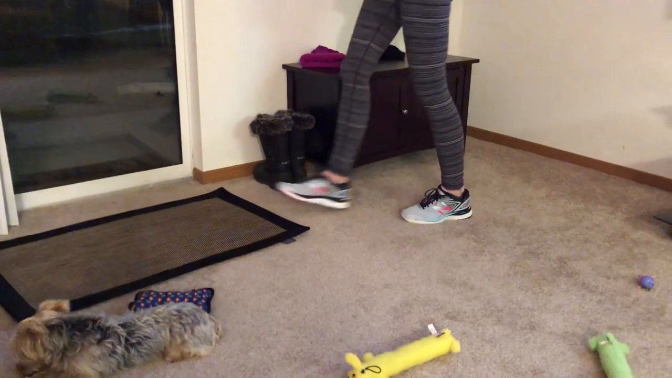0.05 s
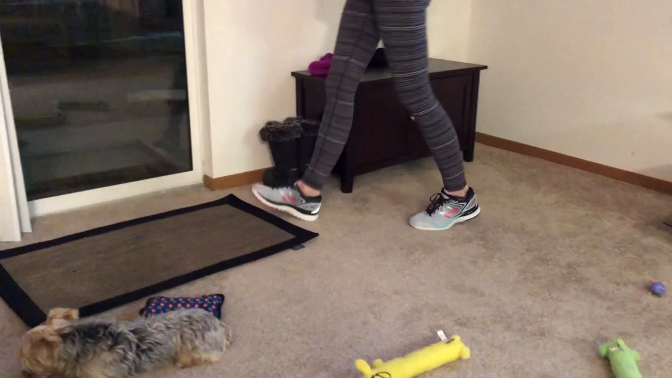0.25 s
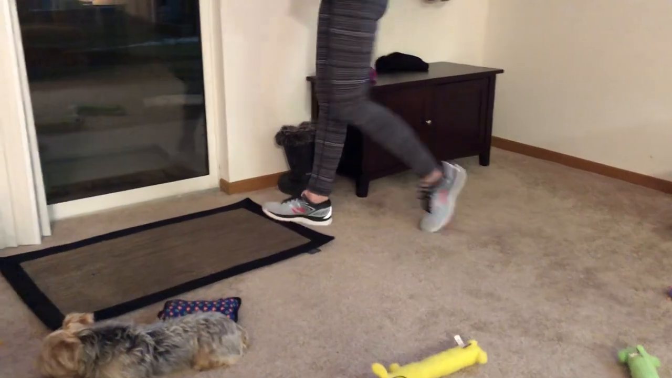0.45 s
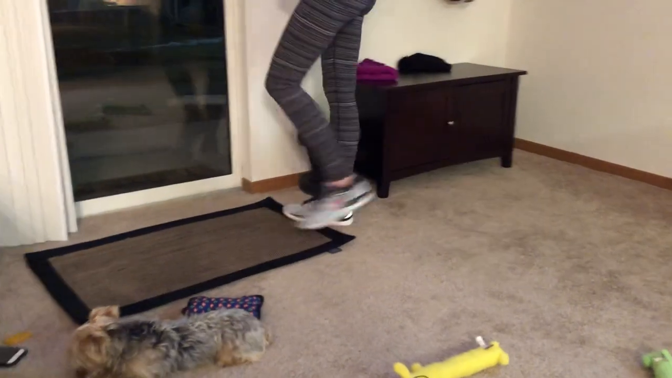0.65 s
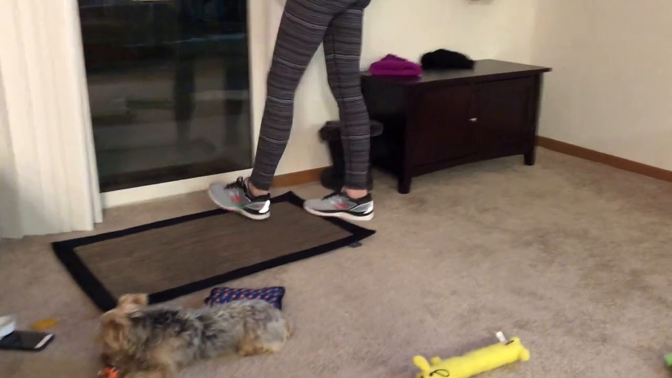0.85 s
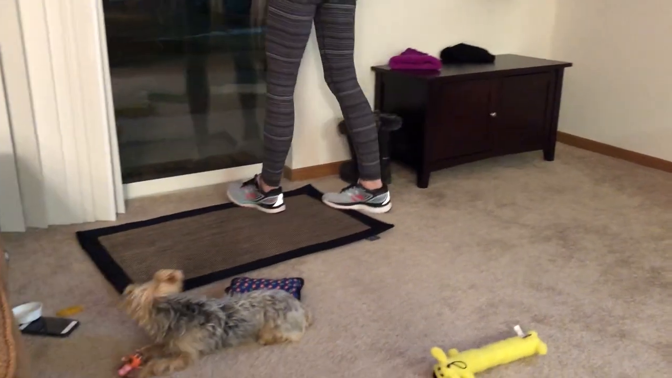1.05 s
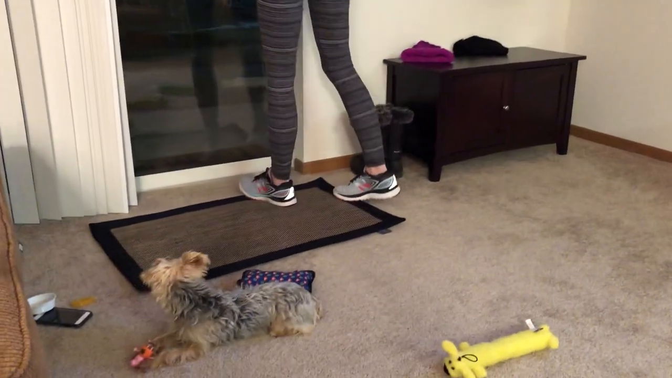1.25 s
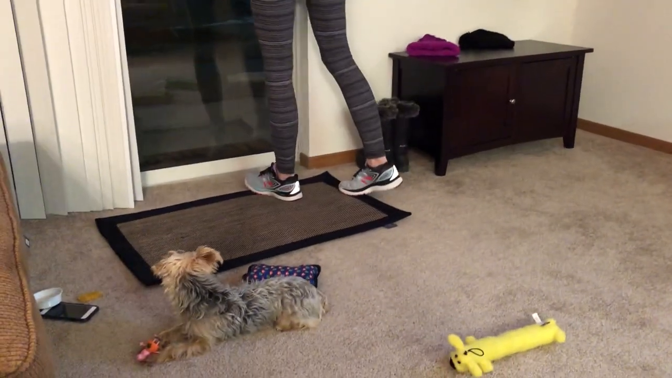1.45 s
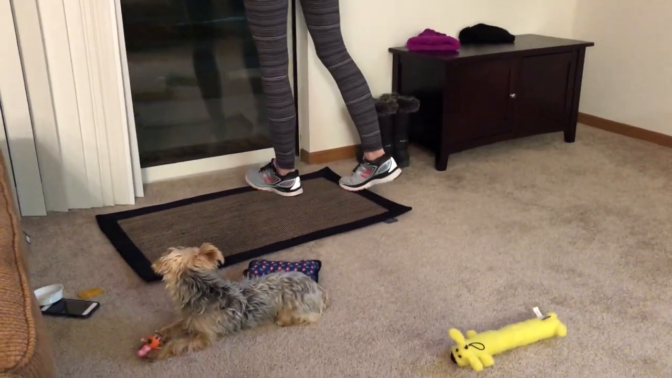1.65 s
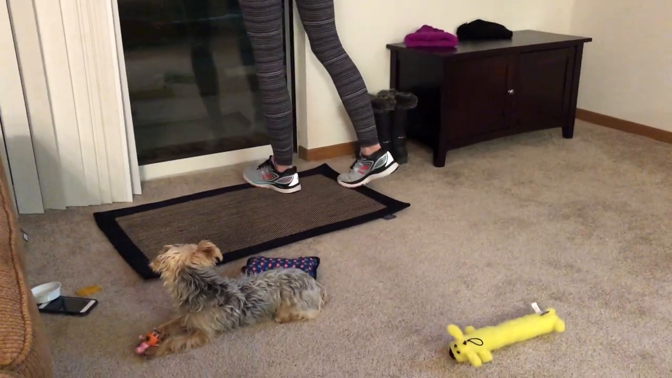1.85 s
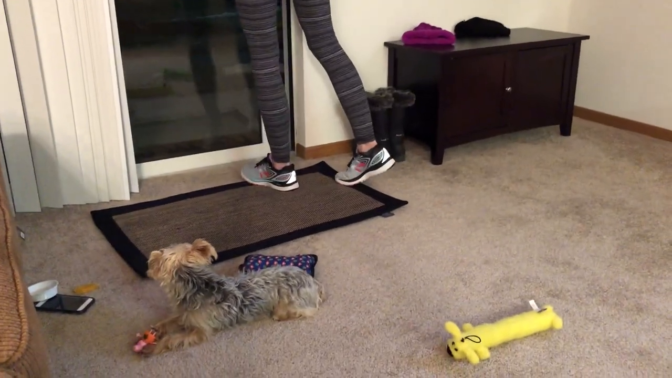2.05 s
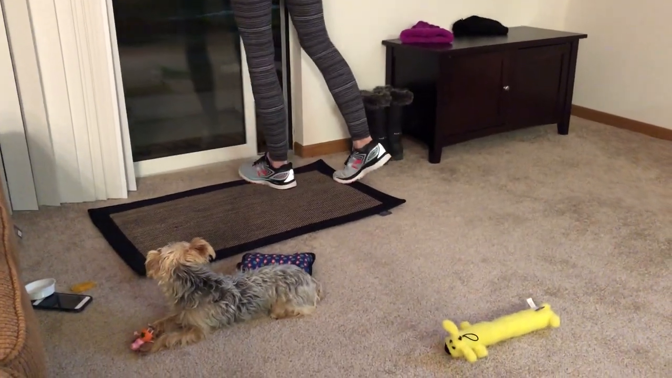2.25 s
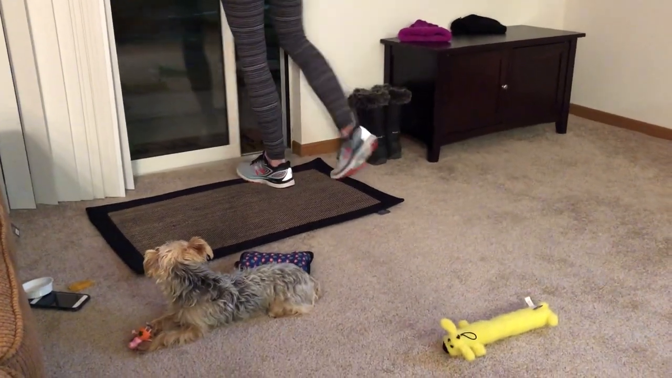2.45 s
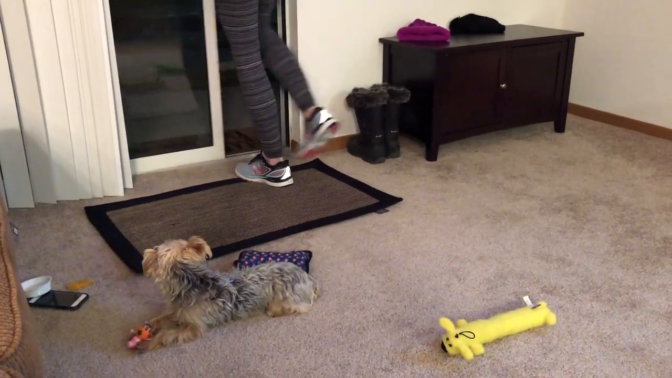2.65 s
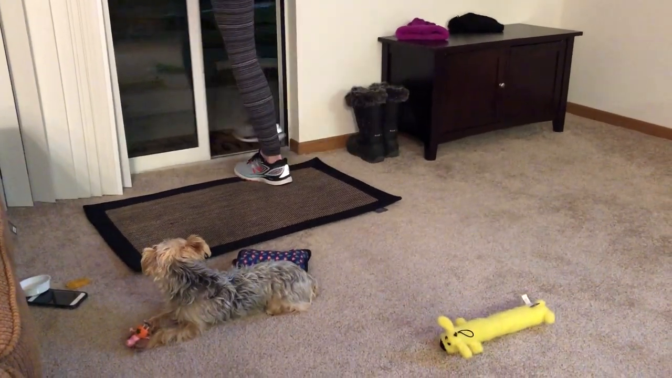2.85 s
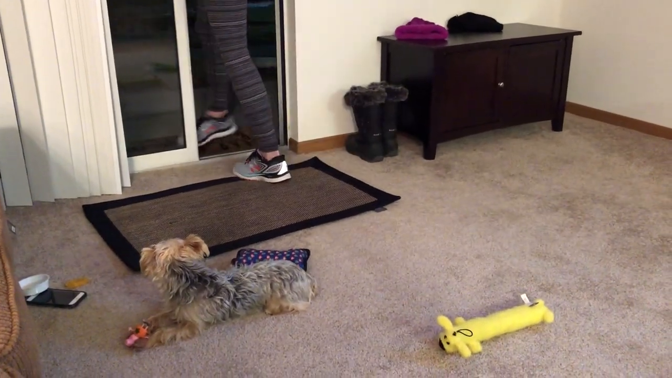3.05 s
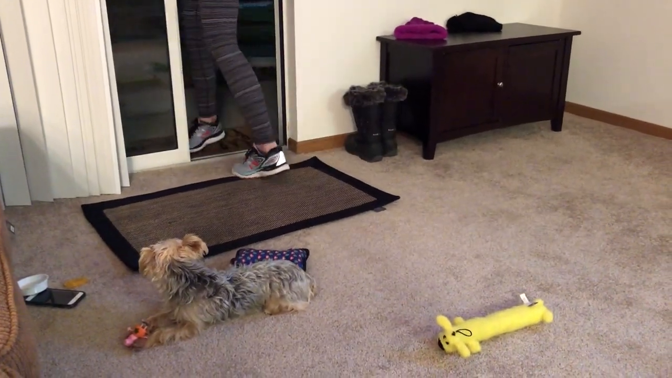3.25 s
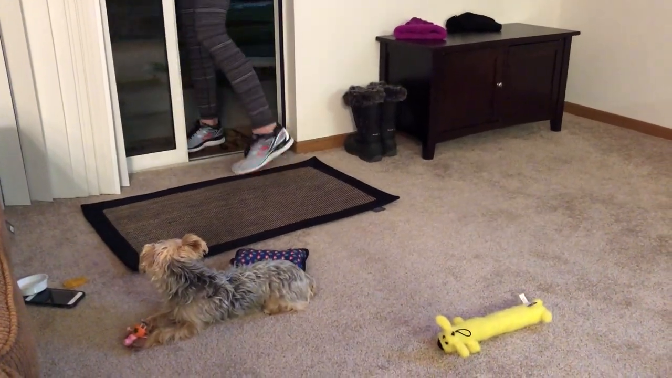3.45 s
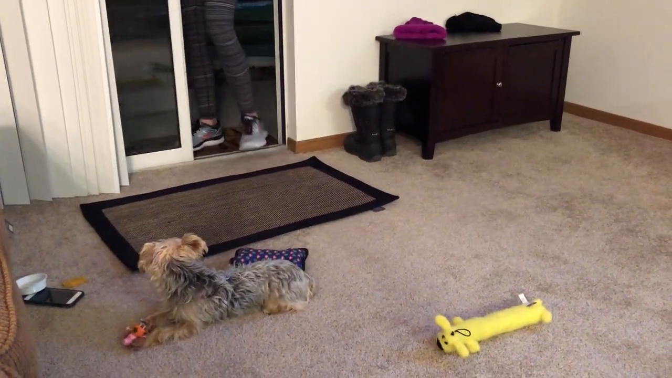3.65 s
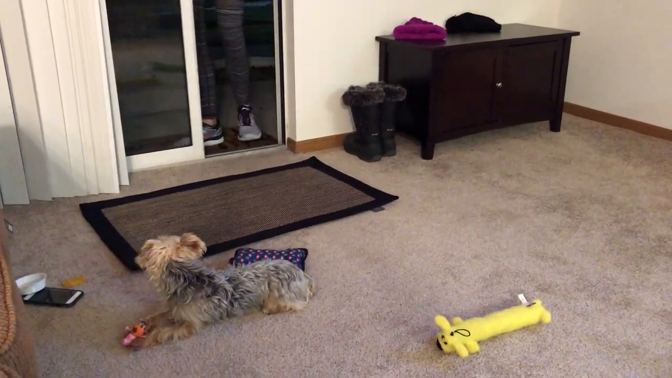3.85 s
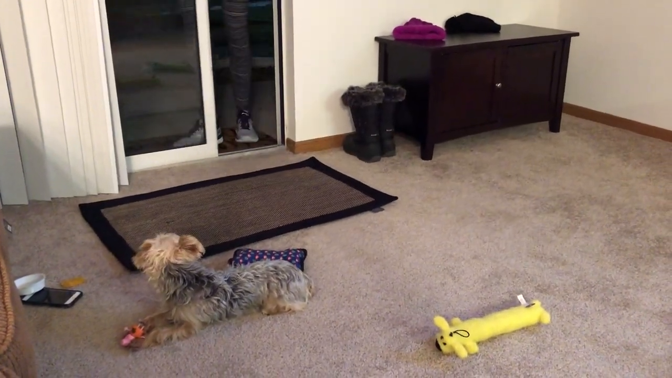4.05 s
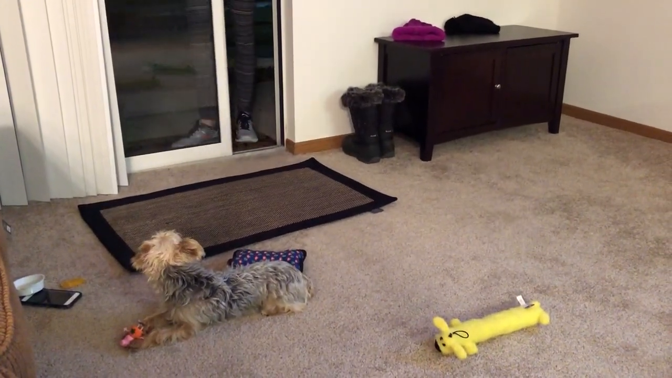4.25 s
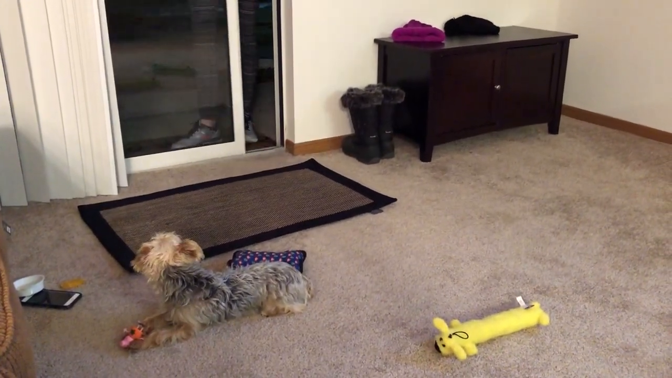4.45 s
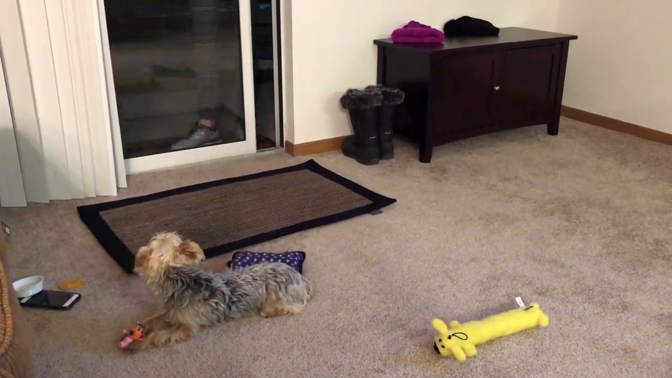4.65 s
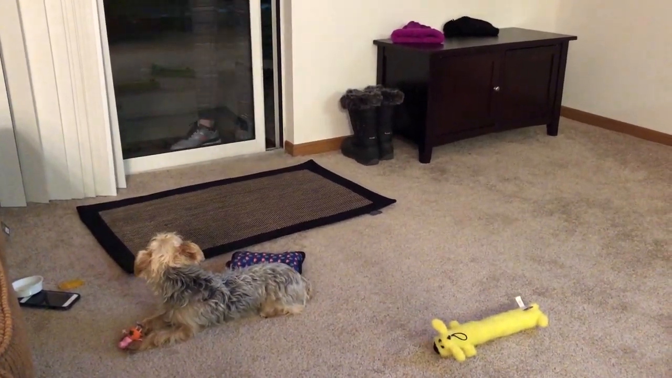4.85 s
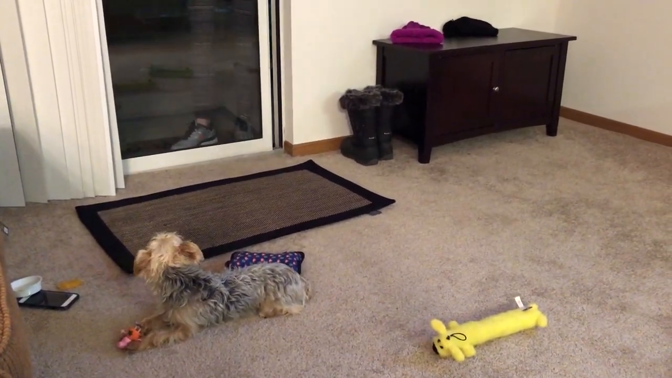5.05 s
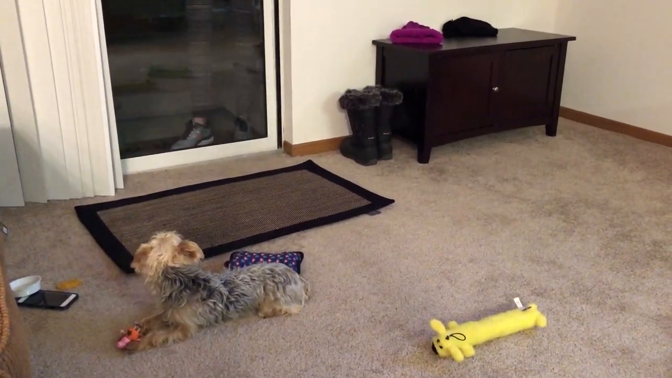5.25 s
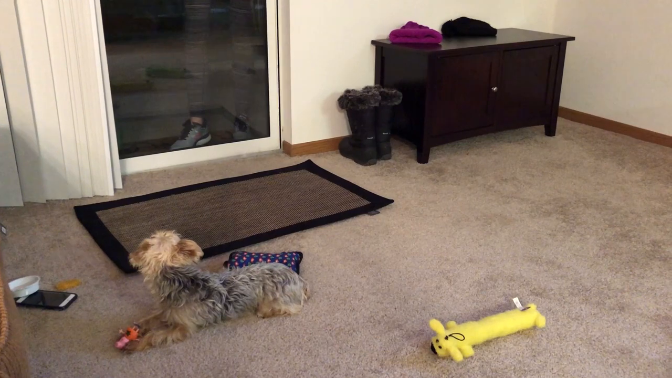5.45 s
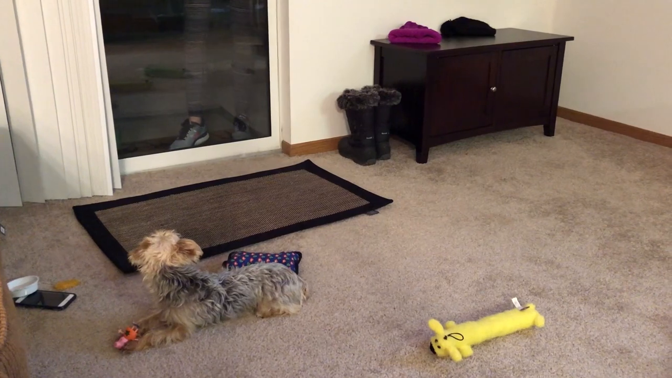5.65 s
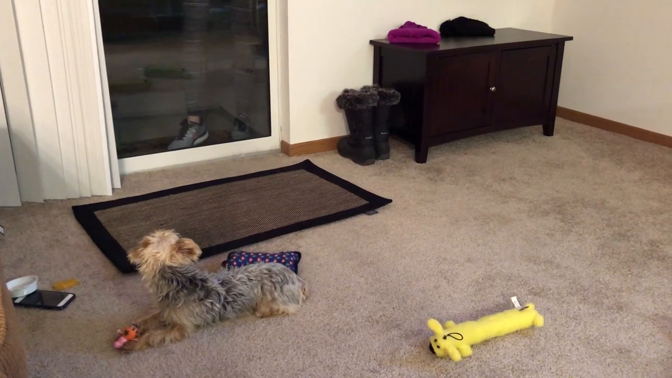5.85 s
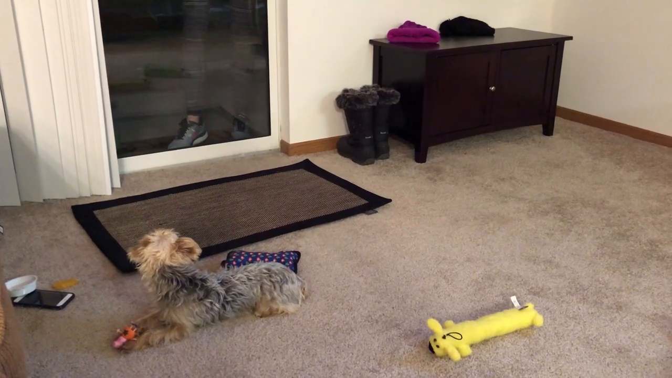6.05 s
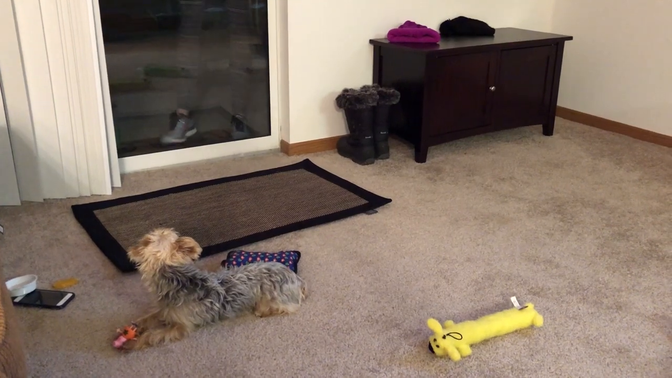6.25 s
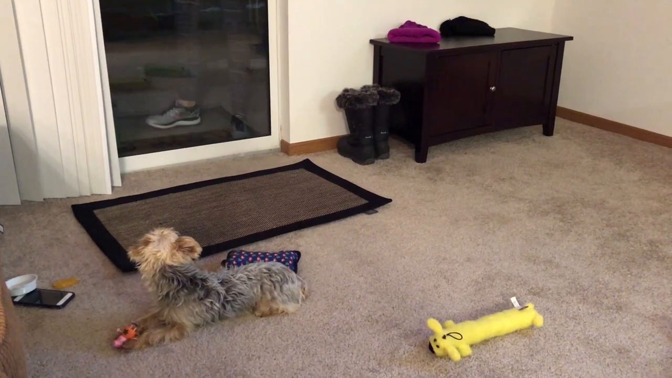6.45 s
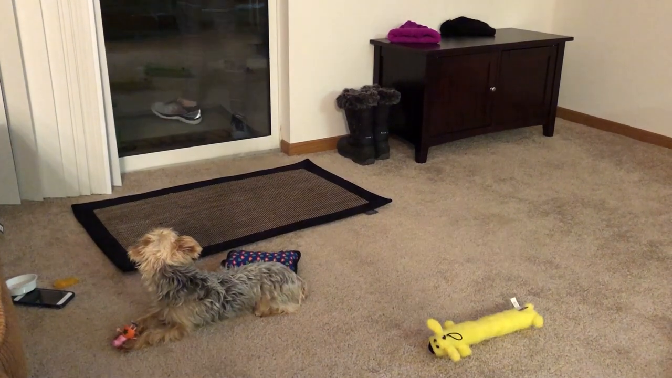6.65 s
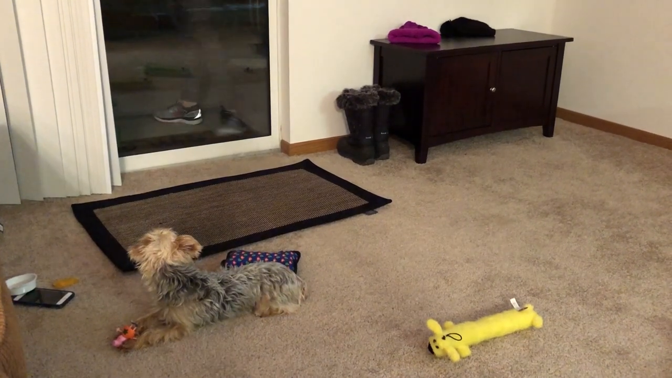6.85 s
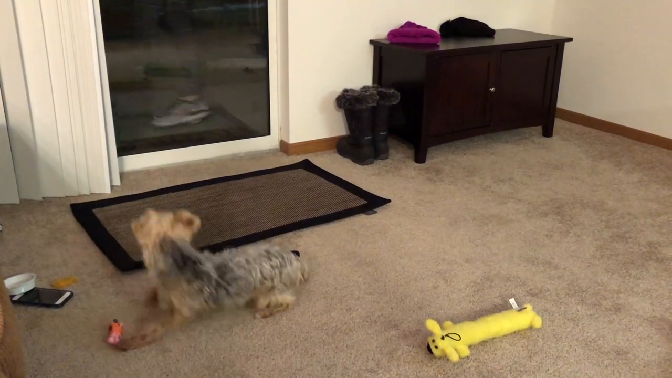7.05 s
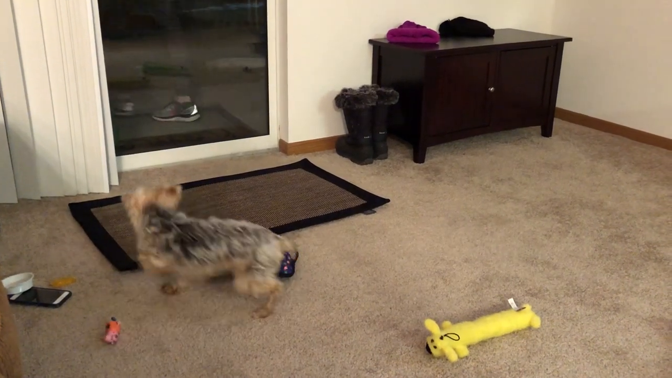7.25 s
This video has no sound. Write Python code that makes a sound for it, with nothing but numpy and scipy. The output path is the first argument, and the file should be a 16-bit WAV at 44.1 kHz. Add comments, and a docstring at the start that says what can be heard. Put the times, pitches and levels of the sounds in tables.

```python
"""Shoes and clothes, made of fine noise grains, rustle over a low hum that fades into the quiet room.
A sliding glass door is unlatched (ringing metal and glass) and peeled off its squealing weather seal.
It rolls open on wheels that jolt a rough track, with drones, rattles and one ping of the rail.
Clothes brush the frame as someone steps out, and the door rolls back.
It bumps the jamb, squeaks as a thin whistle, swishes into the seal and knocks shut."""
import sys
import numpy as np
from scipy import signal
from scipy.fft import rfft, irfft
from scipy.io import wavfile
from scipy.ndimage import uniform_filter1d

SR = 44100
rng = np.random.default_rng(int(sys.argv[2]) if len(sys.argv) > 2 else 0)


def dump_mix(stems):
    """Bounce the given channels to the path in sys.argv[1] as a 16-bit WAV at rate SR."""
    frames = np.atleast_2d(stems).T  # one column per channel
    limited = np.clip(frames, -1, 1)  # hard clip at full scale
    pcm = np.round(limited * 32767).astype(np.int16)
    wavfile.write(sys.argv[1], SR, pcm)


N = 322088
T = np.arange(N) / SR   # time of every sample [s]

# Ways the track and the floor under it ring: (pitch [Hz], level [dB], time to fall 60 dB [s])
TRACK = [(41, -21, 0.27), (51.7, -8.5, 0.36), (77.5, -3.5, 0.13), (106.3, -5, 0.18), (129.8, 0, 0.28),
         (149.3, -7, 0.34), (185.3, 1.5, 0.17), (229, 3.5, 0.11), (270.6, 1, 0.12), (319, 2.5, 0.16),
         (350.3, 1, 0.28), (376.6, -2.5, 0.14), (442.5, -6, 0.16), (497.5, 0, 0.12), (545.3, -2, 0.31),
         (583, -6, 0.33), (645.3, -1.5, 0.15), (716, 4.5, 0.087), (774, 2.5, 0.081), (887.3, 0.5, 0.15),
         (980, -41, 0.068), (1052, -4.5, 0.15), (1160, -1, 0.1), (1221, 3, 0.11)]
# Ways the metal frame and latch ring: (pitch [Hz], level [dB], time to fall 60 dB [s])
FRAME = [(459, -3.5, 0.23), (568, 0, 0.12), (650, -6, 0.24), (702, -2.5, 0.23), (758, -2, 0.13),
         (817.5, -0.5, 0.14), (856, -6, .19), (1066, -24, 0.12), (1156, -10, .13), (1318, -2.5, 0.24),
         (1455, -2, 0.15), (1740, 4, 0.14), (2000, 2, 0.092), (2340, -9, 0.072), (2730, 3, 0.049),
         (2825, -6, 0.049), (3840, -5, .08), (4830, 5, 0.2), (4960, -11, 0.26), (4950, -1, .2),
         (7840, -8, .1), (8340, -10, .13)]
# Rolling loudness while the door opens, which stands for its speed: (time [s], level [dB])
OPENING = [(1.7, -61), (2.0, -43), (2.3, -38.5), (2.56, -39.5), (2.72, -40.5), (2.85, -41), (3.2, -49),
           (3.35, -51.5), (3.58, -62)]
# The same while it closes: (time [s], level [dB])
CLOSING = [(3.66, -60.5), (3.93, -43), (4.06, -40), (4.17, -41), (4.26, -38.5), (4.72, -41), (4.88, -44.5),
           (5.02, -46), (5.5, -64.5), (5.58, -76)]

RUB_JUDDER_DB, RUB_JUDDER_PER_S = 2, 83   # the rub catches and lets go


def from_db(db):
    """Turn decibels into a plain gain."""
    return 10 ** (np.asarray(db) / 20)


def rms_one(x):
    """Scale a sound to an average (rms) level of 1."""
    return x / np.sqrt(np.mean(x ** 2) + 1e-20)


def even(x):
    """Hold the running level at rms 1, keeping the fast flutter."""
    return x / np.sqrt(uniform_filter1d(x * x, size=SR // 7) + 1e-12)


def in_time(rows):
    """Columns of a curve at every sample."""
    times, *columns = np.transpose(rows)
    return [np.interp(T, times, column) for column in columns]


def during(start, end, fade):
    """Gain of one from start to end, fading outside."""
    return np.clip(1 + np.minimum(T - start, end - T) / fade, 0, 1)


def swell(s, db, rise, fall):
    """Gain that grows to a peak at time s and dies away."""
    return from_db(db) * np.exp(-np.maximum((s - T) / rise, (T - s) / fall))


def wobble(depth_db, per_s):
    """Wandering gain of a contact that bears unevenly."""
    times = np.arange(0, 8, 1 / 200)
    r = np.exp(-2 * np.pi * per_s * times[1])
    slow = signal.lfilter([1], [1, -2 * r, r * r], rng.standard_normal(len(times)))
    return from_db(depth_db * np.interp(T, times, rms_one(slow)))


def at_hz(points, hz):
    """Read a curve drawn over a logarithmic pitch scale."""
    f, value = np.transpose(points)
    return np.interp(np.log(hz + 1e-3), np.log(f), value)


def colour(x, spectrum):
    """Give x a spectrum that falls away steeply past its ends; rms 1."""
    hz = np.arange(len(x) // 2 + 1) * SR / len(x) + 1e-3
    low_end = 1 / np.sqrt(1 + (.8 * spectrum[0][0] / hz) ** 8)
    high_end = 1 / np.sqrt(1 + (.8 * hz / spectrum[-1][0]) ** 8)
    shape = from_db(at_hz(spectrum, hz)) * low_end * high_end
    return rms_one(irfft(rfft(x) * shape, len(x)))


def band(x, low_hz, high_hz, order=2):
    """Keep only the pitches between two limits."""
    sos = signal.butter(order, [low_hz, min(high_hz, .45 * SR)], "band", fs=SR, output="sos")
    return signal.sosfilt(sos, x + 1e-18)


def ring(x, hz, t60):
    """A unit click sets a sine of height 1 ringing."""
    r, w = from_db(-60 / (t60 * SR)), 2 * np.pi * hz / SR
    return signal.lfilter([0, np.sin(w)], [1, -2 * r * np.cos(w), r * r], x + 1e-18)


def body(x, modes):
    """Drive several rings side by side, with alternating signs."""
    return sum((-1) ** k * from_db(db) * ring(x, hz, t60) for k, (hz, db, t60) in enumerate(modes))


def struck(modes, centre_hz, octaves, t):
    """The modes near a centre pitch ring out, each in its own phase; rms 1 at the start."""
    hz, level_db, t60 = np.transpose(modes)[:, :, None]
    weight = from_db(level_db) / (1 + (np.abs(np.log2(hz / centre_hz)) / octaves) ** 3)
    swing = np.sin(2 * np.pi * (hz * t + rng.random(hz.shape))) * from_db(-60 * t / t60)
    return np.sum(weight * swing, axis=0) / np.sqrt(np.sum(weight ** 2) / 2)


def moving_ring(x, hz, width_hz):
    """A resonance whose centre can glide; it keeps the power of white input."""
    turn, r = np.exp(2j * np.pi * np.cumsum(hz) / SR), np.exp(-np.pi * width_hz / SR)
    return np.sqrt(2 * (1 - r * r)) * np.real(turn * signal.lfilter([1], [1, -r], x / turn + 1e-18))


def grains(per_s, spread_db):
    """Random clicks of uneven size, at about unit power."""
    born = rng.random(N) < per_s / SR
    sizes = rms_one(from_db(spread_db * np.minimum(rng.exponential(1, N), 4)))
    return born * sizes * rng.choice([-1, 1], N) * np.sqrt(SR / per_s)


def add(out, s, x):
    """Mix x into out, starting at time s."""
    i = max(int(s * SR), 0)
    out[i:i + len(x)] += x[:N - i]


def room(x, wet_db):
    """Direct sound plus a diffuse tail that dies octave by octave; soft surfaces dull its treble."""
    # How long the room rings: (pitch [Hz], time to fall 60 dB [s])
    room_t60 = [(60, 1.15), (130, 1.05), (255, .45), (400, .45), (600, .7), (1000, .62), (2000, .68),
                (6000, .6), (14000, .3)]
    wall_loss_db, wall_hz = 10, 1760   # carpet and blinds soak up the treble of the tail
    t, tail = T[:SR], 0
    for hz in 45 * 2. ** np.arange(9):
        fading = from_db(-60 * t / at_hz(room_t60, hz * np.sqrt(2)))
        tail = tail + band(rng.standard_normal(SR), hz, 2 * hz) * fading
    tail = tail * np.clip(t / 0.0033, 0, 1)
    lows = signal.sosfilt(signal.butter(1, wall_hz, fs=SR, output="sos"), x + 1e-18)
    reflected = lows + from_db(-wall_loss_db) * (x - lows)
    return x + from_db(wet_db) * signal.fftconvolve(reflected, tail / np.sqrt(np.sum(tail ** 2)))[:N]


def background():
    """Shoes and clothes rustle in grains over a ringing hum, then only the noise of the air is left."""
    # Shoes and clothes brushing: (time [s], level [dB], rise [s], fall [s])
    step_rows = [(.08, -55.5, 0.43, 0.32), (.45, -61, 0.12, 0.095), (.68, -66.5, 0.3, 0.28),
                 (1.15, -65.5, 0.64, 0.13)]
    # Colour of the rustle: (pitch [Hz], level per Hz [dB])
    rustle_spectrum = [(150, -49), (250, -9), (282, -4), (536, -0.5), (605, -2.5), (745, -1), (950, -4.5),
                       (1320, -4), (1420, -6), (1870, -6), (3740, -8.5), (15800, -19.5)]
    # Low drone of the room: (pitch [Hz], level [dB], time to fall 60 dB [s])
    hum_modes = [(55.3, 0.5, 0.17), (92, -5, 0.37), (135, 4.5, 0.35), (165.2, 2, 0.54), (203, 1, 0.15)]
    # Steady tones in the hum: (pitch [Hz], level against the drone [dB])
    hum_tones = [(99, -1.5), (166, -6)]
    # Colour of the quiet air: (pitch [Hz], level per Hz [dB])
    air_spectrum = [(15, -12), (25, -14), (64, 0), (102, -1.5), (113, -20.5), (133, 2), (189, -11),
                    (352, -10), (381, -13), (1180, -24), (3480, -30.5), (4210, -29.5), (4810, -31),
                    (15800, -35)]
    hum_db, hum_end_s, hum_fade_s, air_db = -67, 1.07, 0.64, -69
    steps = np.sqrt(sum(swell(*row) ** 2 for row in step_rows))
    rustle = steps * colour(grains(6000, 0.91), rustle_spectrum)
    tones = sum(from_db(db) * np.sqrt(2) * np.sin(2 * np.pi * (hz * T + rng.random()))
                for hz, db in hum_tones)
    drone = even(body(rng.standard_normal(N), hum_modes))
    hum = from_db(hum_db) * during(0, hum_end_s, hum_fade_s) * (drone + tones)
    air = from_db(air_db) * colour(rng.standard_normal(N), air_spectrum)
    return rustle + hum + air


def ticks():
    """Grit, sill and handle give brief clicks; the duller ones set the frame ringing more."""
    # Small ticks: (time [s], level [dB], centre pitch [Hz])
    tick_rows = [(0.091, -47, 13000), (1.133, -60, 5100), (1.175, -62.5, 870), (1.622, -53.5, 13200),
                 (3.264, -54, 5000), (5.627, -52.5, 13000), (6.097, -65, 8760), (6.195, -67.5, 3440),
                 (6.304, -64, 2960), (6.875, -68, 4480)]
    tick_s, ring_db, ring_below_hz = 0.01, -3, 2700   # fall time, ring against click, where the ring weakens
    out, t = np.zeros(N), T[:SR // 4]
    for s, db, hz in tick_rows:
        noise = band(rng.standard_normal(len(t)), hz / 2, hz * np.sqrt(2))
        click = rms_one(noise) * np.exp(-t / tick_s)
        ring_gain = from_db(ring_db) / (1 + (hz / ring_below_hz) ** 4)
        frame = ring_gain * struck(FRAME, hz, 0.52, t)
        add(out, s, from_db(db) * (click + frame) * (1 - np.exp(-6 * t / tick_s)))
    return out


def scuffs():
    """Dry scrapes of grains, some brief and some slower, judder as the door peels, rolls and shuts."""
    # Dry scuffs: (time [s], level [dB], rise [s], fall [s])
    scuff_rows = [(1.319, -50, 0.0045, 0.011), (1.373, -52.5, 0.0034, 0.014), (1.515, -46, 0.026, 0.025),
                  (1.59, -53.5, 0.03, 0.027), (4.27, -64, 0.17, 0.068), (5.69, -57.5, 0.072, 0.05),
                  (5.875, -63.5, 0.0067, 0.041)]
    # Their colour, duller than the rub of the seal: (pitch [Hz], level per Hz [dB])
    scuff_spectrum = [(350, -10), (900, -0.5), (2000, 0.5), (3300, -5.5), (5000, -7), (7500, -12.5),
                      (15000, -19)]
    surges = np.sqrt(sum(swell(*row) ** 2 for row in scuff_rows))
    judder = wobble(RUB_JUDDER_DB, RUB_JUDDER_PER_S)
    return surges * judder * colour(grains(3500, 1.8), scuff_spectrum)


def squeak():
    """A narrow band of noise whistles thinly as the door is pressed against the jamb."""
    # The whistle swells twice: (time [s], level [dB], rise [s], fall [s])
    squeak_rows = [(5.729, -58, .008, 0.01), (5.775, -76, 0.066, 0.025)]
    squeak_hz = 7880
    whistle = rms_one(band(rng.standard_normal(N), squeak_hz - 50, squeak_hz + 50))
    return sum(swell(*row) for row in squeak_rows) * whistle


def seal():
    """The strip sticks and slips ever faster: slips ring a shrill resonance and overtone, over a dry rub."""
    # The seal slides on the jamb, peeling off and seating again: (time [s], length [s], attack [s],
    # first slip rate [per s], last slip rate [per s], squeal level [dB], swell over the stroke [dB],
    # first pitch [Hz], last pitch [Hz], width [Hz], first overtone [dB], last overtone [dB], rub level [dB])
    strokes = [(1.286, 0.2, 0.02, 220, 2200, -51, 2, 4780, 5250, 563, 4.5, 0, -58),
               (5.881, 0.09, 0.033, 2000, 2600, -57, 6, 4800, 7140, 1490, -26, 6, -59)]
    # The seal breaks loose in jerks: (time [s], click height [dB])
    jerks = [(1.2939, -29), (1.3058, -23), (1.3155, -24), (1.332, -32), (1.344, -27), (1.353, -25),
             (1.382, -32), (1.406, -24), (1.442, -27)]
    # Colour of the dry rub: (pitch [Hz], level per Hz [dB])
    rub_spectrum = [(300, 1), (900, 7), (2000, 4.5), (3500, 6.5), (7000, -5), (13000, -5), (15500, -6)]
    squeal_fall_db_per_s, rub_fall_db_per_s = 400, 300   # the seal lets go
    glide_power = 2.8   # the pitch climbs late in the stroke
    sympathy_hz, sympathy_width_hz, sympathy_db = 5150, 70, -17   # the frame sings along with the squeal
    out, rub_power = np.zeros(N), 0
    for (s, length, attack, first_rate, last_rate, squeal_db, swell_db,
         first_hz, last_hz, width_hz, first_db, last_db, rub_db) in strokes:
        progress = np.clip((T - s) / length, 0, 1)
        onset = np.clip((T - s) / attack, 0, 1)
        after = np.clip(T - s - length, 0, 1)
        per_s = first_rate * (last_rate / first_rate) ** progress
        hz = first_hz + (last_hz - first_hz) * progress ** glide_power
        overtone = from_db(first_db + (last_db - first_db) * progress ** 5)
        strength = onset * from_db(squeal_db + swell_db * progress - squeal_fall_db_per_s * after)
        slips = strength * (0.68 * grains(per_s, 1.9) + 0.73 * rng.standard_normal(N))
        slips = slips * wobble(depth_db=1.5, per_s=93)
        for jerk_s, db in jerks:
            if abs(jerk_s - s) < length:
                add(slips, jerk_s, from_db([db]))
        squeal = moving_ring(slips, hz, width_hz)
        squeal = squeal + overtone * moving_ring(slips, 1.92 * hz, width_hz=1600)
        out += band(squeal, 1500, 11200, order=3) / np.sqrt(1 + overtone ** 2)
        rub_power = rub_power + (onset * from_db(rub_db - rub_fall_db_per_s * after)) ** 2
    half_width = sympathy_width_hz / 2
    sympathy = from_db(sympathy_db) * band(out, sympathy_hz - half_width, sympathy_hz + half_width, order=1)
    judder = wobble(RUB_JUDDER_DB, RUB_JUDDER_PER_S)
    rub = np.sqrt(rub_power) * judder * colour(grains(4500, 4.3), rub_spectrum)
    return out + sympathy + rub


def blows():
    """Metal snaps, the frame clacks and rings, and the heavy panel swells into a thud."""
    # Blows on the door: (time [s], thud [dB], thud centre [Hz], clack [dB, 8 added below],
    # clack centre [Hz], frame ring [dB], snap [dB, 5 taken off below], latch ring [dB], latch pitch [Hz],
    # rise of all but the thud [s])
    blow_rows = [(0.843, -51, 198, -51.5, 765, -43.5, -45.5, -50.5, 2810, 0.00054),
                 (0.852, -36, 168, -65, 990, -62, -66, -57, 2810, 0.0016),
                 (1.581, -35.5, 137, -61, 444, -63, -71, -70, 4980, 0.0025),
                 (1.599, -51.5, 303, -54.5, 2030, -51, -64, -56, 2000, 0.0023),
                 (1.620, -41.5, 77, -59.5, 2000, -54, -67, -52, 2340, 0.0022),
                 (5.623, -45, 285, -50, 1490, -48.5, -54, -62, 4700, 0.0024),
                 (5.681, -44, 140, -71, 990, -62, -69, -62, 4700, 0.006),
                 (5.742, -39.5, 95, -61.5, 800, -54.5, -53, -70, 2810, 0.0042),
                 (5.965, -28.5, 265, -48, 650, -44.5, -38.5, -53, 4900, 0.0014),
                 (5.999, -37.5, 135, -61, 646, -72, -50, -70, 2810, 0.005)]
    # Glass panel struck on its edge: (pitch [Hz], level [dB], time to fall 60 dB [s])
    panel = [(53.5, -0.5, 1), (70, -7, 0.92), (112.2, 1, 0.31), (140, -4, 0.45), (160.6, 4, 0.18),
             (184, 1.5, 0.22), (221.7, -4.5, 0.25), (272.4, 4, 0.15), (331, -6.5, 0.43), (364, 3.5, 0.26),
             (416, 5.5, 0.14), (448.6, -3.5, 0.18), (550, -3, 0.13)]
    # Colour of metal on metal: (pitch [Hz], level per Hz [dB])
    snap_spectrum = [(1500, -4), (2800, 5.5), (3400, -2), (4500, 1), (7500, -2), (10000, -6.5),
                     (13000, -23), (15500, -18)]
    thud_octaves = .65   # how far from its centre a blow reaches the panel's modes
    snap_fall_s, clack_fall_s = 0.019, 0.02071
    out, t = np.zeros(N), T[:SR]
    for s, thud_db, thud_hz, clack_db, clack_hz, frame_db, snap_db, latch_db, latch_hz, rise in blow_rows:
        build_up = 1 - np.exp(-t / .014)
        damping = .5 + .5 / (1 + (t / .065) ** 4)   # the gasket takes up the first swings
        thud = from_db(thud_db) * struck(panel, thud_hz, thud_octaves, t) * build_up * damping
        frame = from_db(frame_db) * struck(FRAME, clack_hz, 0.66, t)
        clack_noise = rms_one(band(rng.standard_normal(SR), clack_hz / 2, clack_hz * 2))
        clack = from_db(clack_db + 8.0) * clack_noise * np.exp(-t / clack_fall_s)
        snap_noise = colour(rng.standard_normal(SR), snap_spectrum)
        snap = from_db(snap_db - 5.0) * snap_noise * np.exp(-t / snap_fall_s)
        latch = from_db(latch_db) * struck(FRAME, latch_hz, 0.16, t)
        add(out, s, thud + (frame + latch + clack + snap) * (1 - np.exp(-t / rise)))
    return out


def ping():
    """A wheel snaps over a burr and chatters: each short crack sets the rail ringing."""
    # Snaps at the burr: (time [s], click height [dB])
    snap_rows = [(2.1292, -3.5), (2.1352, -10), (2.1372, -1.5)]
    # Ways the rail rings: (pitch [Hz], level [dB], time to fall 60 dB [s])
    rail = [(1773, -3.5, 0.092), (1900, 0, .06), (1965, -9, .06), (2250, -8, .07), (2340, -8.5, 0.096),
            (2760, -5, 0.083), (2870, -16, 0.066), (3520, -16, .05), (3920, -17, 0.054)]
    rail_db, burr_db, burr_hz, burr_t60_s = -41, -25, 2250, 0.0044
    snaps = np.zeros(N)
    for s, db in snap_rows:
        add(snaps, s, from_db([db]))
    crack = band(ring(snaps, burr_hz, burr_t60_s), 1500, 7000, order=1)
    return from_db(burr_db) * crack + from_db(rail_db) * body(snaps, rail)


def rattles():
    """The panel knocks against its track, rings and bounces once, over a short thump of the track."""
    # Rattles, each ringing at two pitches: (time [s], low level [dB], low pitch [Hz],
    # high level [dB], high pitch [Hz], knock level [dB], thump level [dB])
    rattle_rows = [(2.386, -69, 1330, -57, 3000, -55, -62), (2.583, -45.5, 1220, -60, 2546, -52.5, -57),
                   (3.272, -52.5, 1530, -56, 2200, -59, -55), (3.284, -66, 920, -56, 3210, -53.5, -49),
                   (3.332, -58, 1060, -55, 2900, -49.5, -41.5), (3.445, -59, 1090, -63, 2140, -56.5, -52),
                   (4.419, -54, 2150, -56, 2620, -58, -65), (4.957, -56, 1235, -57, 2200, -63, -40),
                   (5.148, -55, 836, -64, 1770, -62, -44)]
    ring_t60_s, bounce_db, knock_s = 0.074, -6, 0.0098
    thump_hz, thump_damping_s = 440, 0.067   # the wheel drops back onto the track
    out, t = np.zeros(N), T[:SR // 4]
    click = 1. * (t == 0)
    for s, low_db, low_hz, high_db, high_hz, knock_db, thump_db in rattle_rows:
        rings = body(click, [(low_hz, low_db, ring_t60_s), (high_hz, high_db, ring_t60_s)])
        bounce_s = rng.uniform(0.0102, 0.01092)
        for delay, loss_db in ((0, 0), (bounce_s, bounce_db)):
            noise = rms_one(band(rng.standard_normal(len(t)), 760, 2150, order=1))
            knock = from_db(knock_db) * noise * np.exp(-t / knock_s)
            add(out, s + delay, from_db(loss_db) * (knock + rings))
        thump = from_db(thump_db) * struck(TRACK, thump_hz, 1.0, t)
        add(out, s, thump * np.exp(-t / thump_damping_s) * (1 - np.exp(-t / knock_s)))
    return out


def drones():
    """A rough patch drives one narrow resonance of a wheel, which swells, may glide, and fades."""
    # Brief drones: (time [s], level [dB], rise [s], fall [s], pitch [Hz], glide [Hz per s])
    drone_rows = [(2.3, -49, 0.072, 0.098, 695, 0), (2.53, -44.5, 0.074, 0.063, 564, -100),
                  (3.19, -51.5, 0.43, 0.097, 266, 1), (4.04, -53, 0.056, 0.034, 352, 67),
                  (4.27, -54, 0.3, 0.13, 1122, -150), (4.33, -49, 0.056, 0.068, 339, 0),
                  (4.72, -43, 0.024, 0.056, 689, 611), (4.48, -47.5, 0.054, 0.074, 541, 1),
                  (5.0, -52.5, 0.04, 0.055, 549, 0)]
    out = 0
    for s, db, rise, fall, hz, glide in drone_rows:
        pitch = hz + glide * np.clip(T - s, -.2, .2)
        tone = even(moving_ring(rng.standard_normal(N), pitch, width_hz=20))
        out = out + swell(s, db, rise, fall) * tone
    return band(out, 177, 1100)


def travel():
    """Speed adds up to the door's place, which sets growl pitch and the balance of rumble and whirr."""
    # The two passes: (speed curve, share of the track and direction, low boom of the track at the reference
    # level [dB], # lean towards the track's rumble [dB])
    passes = [(OPENING, 0.95, -53, -2.5), (CLOSING, -0.99, -55.5, 0.84)]
    # Sound at each place of the door: (share open, growl pitch [Hz], rumble over whirr before the lean [dB])
    places = [(0, 606, 1.5), (.26, 626, -2), (.55, 450, 1.5), (.8, 340, 7), (.9, 273, 5), (1, 255, -3)]
    speed_law_db = 25   # rolling gains this much for ten times the speed
    level_db, = in_time(OPENING + CLOSING)
    place, lean_db, boom_db = np.zeros(N), [], []
    for curve, direction, boom, lean in passes:
        start, end = curve[0][0], curve[-1][0]
        speed = 10 ** (level_db / speed_law_db) * (T >= start) * (T < end)
        place += direction * np.cumsum(speed) / speed.sum()
        lean_db += [(start, lean), (end, lean)]
        boom_db += [(start, boom), (end, boom)]
    share, hz, place_balance_db = np.transpose(places)
    growl_hz = np.interp(place, share, hz)
    balance_db = np.interp(place, share, place_balance_db) + in_time(lean_db)[0]
    return level_db, in_time(boom_db)[0], growl_hz, balance_db


def rolling():
    """Wheels jolt over a rough track and set it growling; grit crunches and the brush strip hisses."""
    # Colour of the grit: (pitch [Hz], level per Hz [dB])
    grit_spectrum = [(240, -88), (400, 0.5), (504, -12.5), (544, -17), (611, -5), (720, -11), (832, -14),
                     (890, -10), (1090, -15), (1440, -23.5), (4000, -34), (5200, -49), (8800, -120)]
    # Colour of the brush strip: (pitch [Hz], level per Hz [dB])
    brush_spectrum = [(880, -3), (1500, -3.5), (1740, -5.5), (2270, -5.5), (2960, -6.5), (6830, -11),
                      (11400, -13.5), (15000, -17.5), (15800, -17)]
    # Clothes brush past the frame: (time [s], level [dB], rise [s], fall [s])
    swishes = [(3.69, -64, 0.11, 0.088)]
    reference_db = -36   # rolling level at which boom, grit and brush have their stated levels
    grit_db, brush_db = -48, -60
    boom_follows, grit_follows, brush_follows = 0.17, 0.89, 0.34   # shares of the rolling's swing in dB
    rumble_db, whirr_db = -4, -6   # levels of the rumble and whirr against the rolling loudness
    wobble_db, wobble_per_s = 1.25, 13   # the wheels bear unevenly on the track

    level_db, boom_db, growl_hz, balance_db = travel()
    swing_db = level_db - reference_db
    share = from_db(level_db) / np.sqrt(1 + from_db(2 * balance_db))   # splits power by the balance
    jolts = grains(1800, 2.5)
    grit = grains(4500, 2)
    track = body(jolts + 0.36 * moving_ring(jolts, growl_hz, width_hz=146), TRACK)

    boom = from_db(boom_db + boom_follows * swing_db) * even(band(track, 35, 158.4, order=3))
    rumble_gain = wobble(wobble_db, wobble_per_s) * share * from_db(rumble_db + balance_db)
    rumble = rumble_gain * even(band(track, 224, 434, order=3))
    whirr_gain = wobble(wobble_db, wobble_per_s) * share * from_db(whirr_db)
    whirr = whirr_gain * even(band(track, 443, 1080, order=3))
    crunch_gain = wobble(wobble_db, wobble_per_s) * from_db(grit_db + grit_follows * swing_db)
    crunch = crunch_gain * even(colour(grit, grit_spectrum))
    hiss = from_db(brush_db + brush_follows * swing_db) + sum(swell(*swish) for swish in swishes)
    brush = hiss * colour(grains(9000, 1.0), brush_spectrum)
    moving = during(OPENING[0][0], CLOSING[-1][0], 0.25)
    return (boom + rumble + whirr + crunch + brush) * moving


def scene():
    """The door's contacts in the room, its rolling, and the background."""
    hard_contacts = room(blows() + ping(), wet_db=-10.5)
    light_contacts = room(ticks() + rattles() + seal() + scuffs() + squeak(), wet_db=-8.0)
    return (hard_contacts + light_contacts + rolling() + drones() + background())[None]


def record(dry):
    """A steep filter cuts the highest treble."""
    cutoff_hz = 15850
    return signal.sosfilt(signal.ellip(12, .1, 80, cutoff_hz, fs=SR, output="sos"), dry)


dry = scene()
out = record(dry)
dump_mix(out)
```